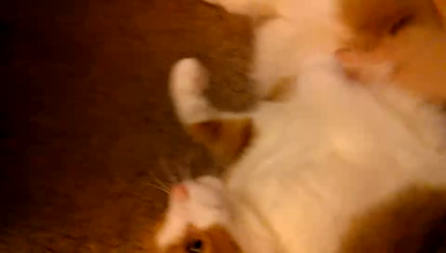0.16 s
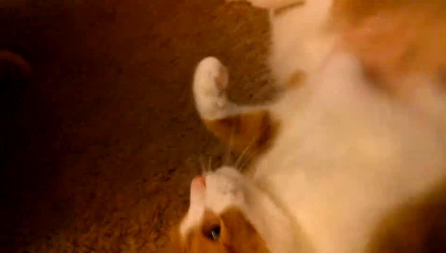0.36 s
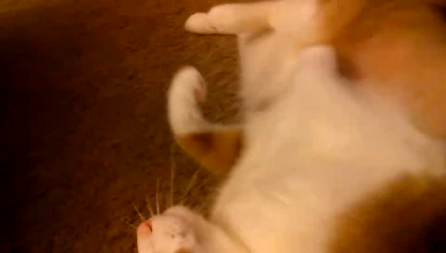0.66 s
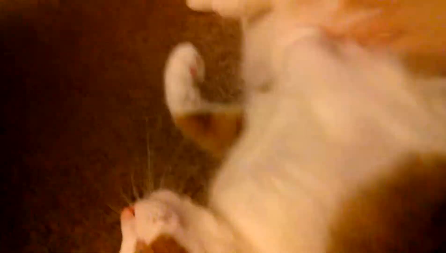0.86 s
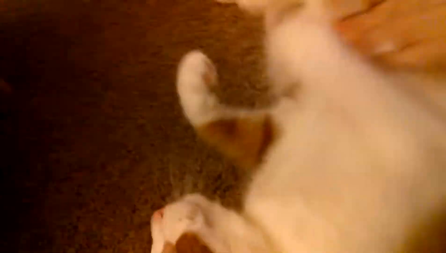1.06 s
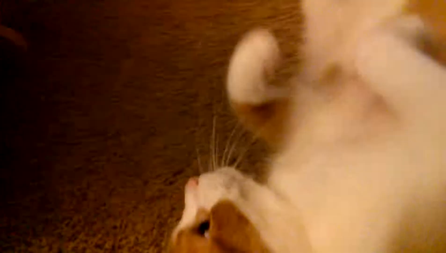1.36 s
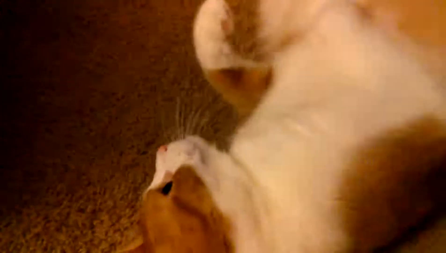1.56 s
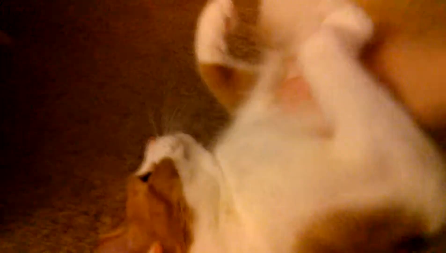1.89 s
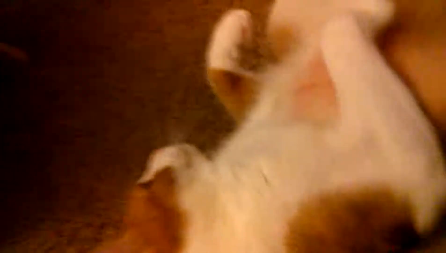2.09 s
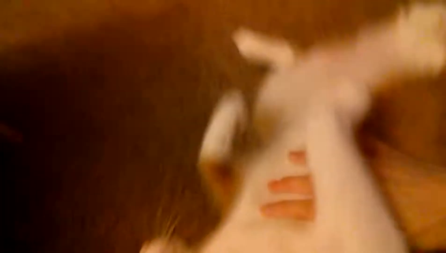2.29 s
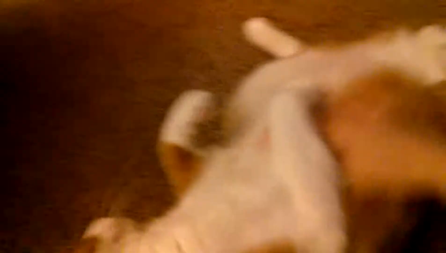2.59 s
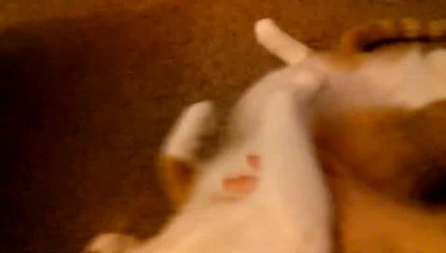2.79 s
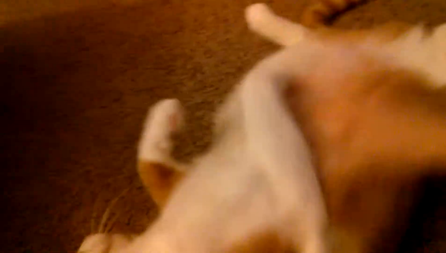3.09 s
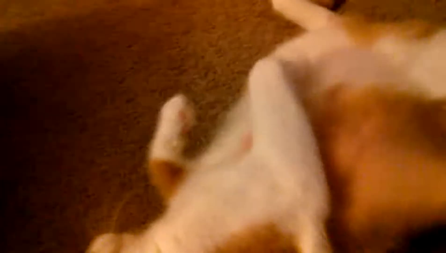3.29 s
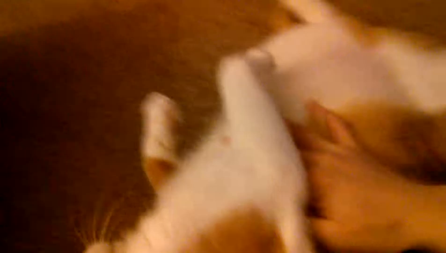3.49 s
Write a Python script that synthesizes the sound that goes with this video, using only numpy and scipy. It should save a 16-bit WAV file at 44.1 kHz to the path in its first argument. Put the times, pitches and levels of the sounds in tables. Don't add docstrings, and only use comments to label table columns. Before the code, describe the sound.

A cat purrs in a low uneven rumble while a hand quickly rubs its furry belly.

```python
import sys
import numpy as np
from scipy import signal
from scipy.fft import rfft, irfft
from scipy.io import wavfile
from scipy.ndimage import uniform_filter1d, map_coordinates

SR = 44100
rng = np.random.default_rng(int(sys.argv[2]) if len(sys.argv) > 2 else 0)


def how_loud(loudness_db):
    steps = np.asarray(loudness_db, float) / 20
    return 10 ** steps


def to_wav(sig):
    pcm = np.clip(np.atleast_2d(sig), -1, 1) * 32767
    pcm = np.round(pcm).astype(np.int16)
    wavfile.write(sys.argv[1], SR, pcm.T)


N = 160965

# time in seconds, hair hiss in dB, coat rustle in dB, shake of the phone in dB.
OUT_STROKES = [(.209, -59.5, -57.5, -44), (0.463, -57.5, -52, -41.5), (0.69, -57.5, -56, -39.5),
               (0.906, -53.5, -58.5, -36), (1.124, -53.5, -58, -33), (1.351, -56.5, -56.5, -35.5),
               (1.577, -58, -59, -40), (1.806, -60, -66.5, -40), (2.022, -59, -63, -41),
               (2.253, -58.5, -63.5, -41.5), (2.485, -57, -64.5, -43.5), (2.729, -57, -68, -50),
               (2.977, -56.5, -70, -40), (3.217, -54.5, -67, -39), (3.448, -55, -69.5, -51)]
# time in seconds, hair hiss in dB, coat rustle in dB.
BACK_STROKES = [(.074, -63.5, -67), (.340, -79, -65), (.570, -58.5, -58.5), (.789, -63.5, -57.5),
                (1.016, -63, -62), (1.239, -64, -60), (1.463, -61.5, -59.5), (1.694, -64.5, -67),
                (1.91, -64.5, -65.5), (2.133, -61, -67), (2.365, -61.5, -66.5), (2.611, -62.5, -68.5),
                (2.857, -60, -65), (3.084, -59.5, -65), (3.318, -57.5, -69), (3.558, -59, -64.5),
                (3.665, -58, -78)]
# pitch in Hz, level in dB.
HAIR_TONE = [(2500, -15.5), (4500, -8.5), (6200, -4), (8000, 2.5), (10500, -1), (13000, -4), (15500, -4)]
# pitch in Hz, level in dB.
COAT_TONE = [(300, -6), (600, 3), (1100, 2), (2000, -1.5), (3200, 0), (4500, -1), (7000, -3.5),
             (12000, -22.5)]
# time in seconds, level in dB.
PURR_LEVEL = [(0.0, -59), (0.03, -47.5), (0.12, -59), (0.28, -45.5), (0.35, -51.5), (0.46, -44),
              (0.65, -52.5), (0.68, -49), (1.61, -50), (1.65, -44.5), (1.74, -54), (1.86, -53.5),
              (2.97, -54), (3.32, -48), (3.36, -52.5), (3.57, -49.5), (3.6, -55), (3.65, -51)]
# pitch in Hz, width in Hz, level in dB.
CHEST_TONES = [(77.8, 35, -7.5), (118.8, 17.3, 3.5), (171.3, 18, 2), (240.6, 19.7, -5), (313, 56, -8),
               (500, 320, -16.5)]
# pitch in Hz, level in dB.
SLIDE_TONE = [(290, -13.5), (500, 2), (542, -1), (775, -5.5), (998, -6), (6090, -9), (8050, -20),
              (12000, -46), (15600, -58), (22000, -120)]
# time in seconds, level in dB.
SLIDE_LEVEL = [
    (0, -60),
    (.2, -56.5),
    (.35, -56.5),
    (.47, -55.5),
    (.6, -57.5),
    (.78, -58.5),
    (.84, -69),
    (1.0, -92),
]
# start in seconds, peak in dB, pitch
# in Hz, ring in seconds.
BODY_KNOCKS_AND_THUDS = [(0.267, -41.5, 320, 0.053), (.407, -32.5, 251, 0.037), (0.442, -32, 173, 0.055),
                         (.464, -34.5, 338, 0.096), (0.409, -38, 500, 0.037), (.474, -31.5, 248, 0.056),
                         (0.883, -45, 157, 0.16), (.975, -44, 150, 0.1), (1.031, -40.5, 487, 0.03),
                         (1.1263, -32.5, 296, 0.03), (1.119, -38, 240, 0.032), (1.244, -44.5, 560, 0.052),
                         (1.252, -41, 420, 0.046), (1.328, -38, 292, 0.071), (1.342, -31, 285, 0.027),
                         (1.458, -30.5, 373, 0.03), (1.463, -41, 518, 0.053), (1.634, -28.5, 175, 0.056),
                         (1.638, -37.5, 287, 0.035), (1.693, -45.5, 320, 0.053), (1.786, -50, 280, 0.058),
                         (1.689, -37.5, 480, 0.043), (1.873, -37.5, 150, 0.04), (3.291, -33.5, 197, 0.037),
                         (3.305, -44, 535, 0.11), (3.304, -37.5, 254, 0.055), (3.44, -46.5, 500, 0.066),
                         (3.52, -37, 170, 0.11), (.195, -49, 195, .05), (0.299, -38.5, 210, 0.076),
                         (0.289, -39, 72.4, 0.088), (.69, -36.5, 160, 0.064), (0.755, -41, 203, 0.031),
                         (.815, -41.5, 470, 0.036), (1.157, -34.5, 84, 0.14), (1.223, -37, 65, 0.2),
                         (1.234, -38, 268, 0.037), (1.428, -40, 62, 0.11), (1.465, -36, 95, 0.11),
                         (1.515, -44.5, 277, 0.046), (1.813, -45, 250, 0.044), (1.9, -40.5, 239, 0.064),
                         (1.932, -39, 89, 0.093), (2.028, -36, 70, 0.13), (2.076, -40, 89, 0.11),
                         (2.234, -44, 232, 0.046), (2.643, -52, 242, 0.065), (3.03, -45, 326, 0.065),
                         (3.244, -37.5, 98, 0.083), (3.345, -50, 520, 0.042), (3.555, -39, 121, 0.078),
                         (.08, -46, 417, .04), (0.271, -44, 500, 0.034), (1.335, -45, 484, 0.043),
                (3.33, -46.5, 329, 0.065), (0.531, -44, 121, 0.06), (0.771, -42, 151, 0.052),
                (0.916, -36, 120, .05), (1.586, -46, 110, 0.078), (1.85, -47, 294, 0.055),
                (1.905, -49, 535, 0.054), (2.111, -41, 158, .05), (2.24, -49, 420, 0.046),
                (2.31, -48.5, 377, 0.041), (2.584, -45, 320, 0.037), (2.599, -39, 140, .05),
                (3.049, -50.5, 470, 0.059), (3.1, -34, 140, 0.072), (3.213, -50, 306, 0.065),
                (3.411, -53.5, 486, 0.13)]
# multiple of its pitch, level in dB.
BODY_PARTIALS = [(1., 0), (.84, -5), (.6, -3), (1.3, -11)]
# start in seconds, peak in dB, pitch in Hz, ring in seconds.
CLAW_TICKS = [(.2720, -40, 960, 0.0039), (0.4652, -36, 1020, 0.0097), (0.466, -50, 3370, .005),
              (.9138, -47, 5500, .006), (1.1216, -48, 2170, 0.0028), (1.1246, -34.5, 1110, 0.0046),
              (1.1246, -29.5, 1960, 0.002), (1.4991, -38, 8060, 0.0013), (1.787, -56, 960, 0.011),
              (2.0065, -46, 900, 0.0059), (2.0103, -52, 1510, 0.005), (2.024, -63, 1650, 0.0055),
              (3.286, -55, 1050, .008), (3.305, -58, 930, 0.024), (.478, -39, 740, 0.0073),
              (.4435, -38.5, 890, 0.0045), (2.821, -63, 910, 0.013), (3.196, -55, 790, 0.029)]
# pitch in Hz, level in dB.
SNAP_TONE = [(5000, -5), (9000, -3), (13500, 0), (16500, -2)]
# pitch in Hz, level in dB.
SHAKE_TONE = [(4, -29), (10, 2.5), (20, 0), (35, -11), (60, -13.5), (90, -15.5), (150, -38)]
# pitch in Hz, level in dB.
ROOM_TONE = [(120, -37), (200, -2), (653, -18.5), (1110, -22), (1380, -26.5), (3010, -31), (6350, -31.5),
             (8350, -27), (15500, -26)]
# pitch in Hz, level in dB.
SIDE_TONE = [(300, -7.5), (1000, -5.5), (2000, 4), (4000, 4), (6000, 0), (9000, -16.5), (14000, -2.5)]
# pitch in Hz, dB relative to the sound around it.
FAINT_LIMIT = [(800, -21), (1500, -10.5), (4500, -10), (6500, -9), (11000, -18), (13500, -8), (16000, 1)]
# time in seconds, length in seconds, from Hz, to Hz.
HOLES = [
    (.40, .022, 9000, 15700),
    (.955, .02, 2800, 5300),
    (1.19, .025, 4300, 5300),
    (1.645, .035, 2000, 6000),
    (1.66, .02, 13800, 15000),
    (2.05, .05, 3900, 4600),
    (2.24, .05, 4100, 4400),
]

TIME = np.arange(N) / SR


def unit(x):
    return x / np.sqrt(np.mean(x ** 2))


def colour(x, points):
    hz, db = np.array(points, float).T
    log_hz = np.log(hz)
    f = np.log(np.fft.rfftfreq(N, 1 / SR) + 1e-3)
    outside = np.maximum(log_hz[0] - f, 0) + np.maximum(f - log_hz[-1], 0)
    return irfft(rfft(x) * how_loud(np.interp(f, log_hz, db) - 12 * outside), N)


def smooth_twice(x, size):
    return uniform_filter1d(uniform_filter1d(x, size=size), size=size)


def walk(rate):
    hold = int(SR / rate)
    aims = rng.standard_normal(N // hold + 1)
    return unit(smooth_twice(np.repeat(aims, hold), hold)[:N])


def grit(points, grain_db, flicker_db, count=3):
    grains = rng.standard_normal(N) * how_loud(grain_db * rng.exponential(size=N))
    f, t, z = signal.stft(unit(colour(grains, points)), SR, nperseg=512)
    at = np.meshgrid(count * np.log2(f / 60 + 1), 40 * t, indexing="ij")
    patch = map_coordinates(rng.standard_normal((40, 300)), at, order=1, mode="wrap")
    return unit(signal.istft(z * how_loud(flicker_db * patch), SR)[1][:N])


def curve(rows):
    return how_loud(np.interp(TIME, *np.array(rows, float).T))


def swell(s, db, rise, fall):
    grip_db, grip_s = -5.5, 0.0082
    away = TIME - np.asarray(s)[:, None]
    bell = np.exp(-(away / np.where(away < 0, rise, fall)) ** 2)
    grip = how_loud(2 * grip_db) * np.exp(-(away / grip_s) ** 2)
    return np.sqrt(np.sum(how_loud(2 * np.asarray(db))[:, None] * (bell + grip), axis=0))


def add_ring(out, s, db, hz, ring_s, rise, phase):
    i = int(s * SR)
    t = np.arange(min(int(1.5 * ring_s * SR), N - i)) / SR
    tone = np.sin(2 * np.pi * hz * t + phase)
    out[i:i + len(t)] += how_loud(db) * (1 - np.exp(-t / rise)) * how_loud(-60 * t / ring_s) * tone


def strokes():
    out_s, out_hair, out_coat, _ = np.array(OUT_STROKES).T
    back_s, back_hair, back_coat = np.array(BACK_STROKES).T

    def both_ways(out_db, back_db, lag, stretch):
        outward = swell(out_s + lag, out_db, stretch * 0.022, stretch * 0.017)
        back = swell(back_s + lag, back_db, stretch * 0.029, stretch * 0.031)
        return np.hypot(outward, back)

    fingers = swell(out_s + 0.032, out_hair - 7, 0.038, 0.038)
    hair_gain = np.hypot(both_ways(out_hair, back_hair, 0, 0.84), fingers)
    coat_gain = both_ways(out_coat, back_coat, 0.00033, 0.83)
    return hair_gain * grit(HAIR_TONE, 1.9, 0.5) + coat_gain * grit(COAT_TONE, 2.44, 4.43)


def purr():
    purr_hz, jitter, scatter_db = 26, .16, 2.5
    pulse_db, breath_db, open_share, even_share = -2.5, -4, .6, .7
    phase = np.cumsum(purr_hz * (1 + jitter * walk(22))) / SR
    size = how_loud(scatter_db * rng.standard_normal(N // 500))[phase.astype(int)]
    pulses = size * (np.diff(np.floor(phase), prepend=0) > 0)
    puffs = size * np.exp(-(phase % 1) / open_share) * rng.standard_normal(N)
    drive = how_loud(pulse_db) * unit(pulses) + how_loud(breath_db) * unit(puffs)
    chest = np.zeros(N)
    for k, (hz, width, db) in enumerate(CHEST_TONES):
        ring = signal.lfilter(*signal.iirpeak(hz, hz / width, SR), drive)
        power = smooth_twice(ring ** 2, 3000) / np.mean(ring ** 2) + 1e-9
        steady = ring / power ** (even_share / 2)
        chest += (-1) ** k * how_loud(db) / np.sqrt(width) * steady
    return unit(colour(chest, [(50, -2), (80, -1.5), (550, 0.5), (900, -29)])) * curve(PURR_LEVEL)


def slide():
    return curve(SLIDE_LEVEL) * grit(SLIDE_TONE, 2.38, 0.73)


def knocks_and_thuds():
    out = np.zeros(N)
    for s, db, hz, ring_s in BODY_KNOCKS_AND_THUDS:
        for ratio, part_db in BODY_PARTIALS[:3]:
            phase = 2 * np.pi * rng.random() * (ratio != 1)
            add_ring(out, s, db + part_db, hz * ratio, ring_s, .0025, phase)
    return out


def ticks():
    out = np.zeros(N)
    for s, db, hz, ring_s in CLAW_TICKS:
        add_ring(out, s, db + 5.5, hz, ring_s, 0.22 / hz, np.pi)
    return out


def snap():
    x = np.zeros(N)
    x[int(.91355 * SR)] = how_loud(-13.5)
    no_lows = signal.butter(6, 5000, "high", fs=SR, output="sos")
    return signal.sosfilt(no_lows, colour(x, SNAP_TONE))


def shake():
    out_s, _, _, shake_db = np.array(OUT_STROKES).T
    sway = grit(SHAKE_TONE, 0.11, 0.67)
    sway = unit(sway / np.sqrt(uniform_filter1d(sway ** 2, size=5000)))
    return np.hypot(swell(out_s + 0.045, shake_db, 0.04, 0.04), how_loud(-46.5)) * sway


def room():
    return how_loud(-59) * grit(ROOM_TONE, 0.05, 1.6)


def side_patches(air):
    strength = np.sqrt(uniform_filter1d(air ** 2, size=8000))
    return how_loud(-22) * grit(SIDE_TONE, .1, 12.7, count=6) * strength


def scene():
    air = strokes() + slide() + room()
    mid = air + purr() + knocks_and_thuds() + ticks() + snap() + shake()
    side = side_patches(air)
    return np.array([mid + side, mid - side])


def band_limit(x):
    return signal.sosfilt(signal.butter(12, 16440, fs=SR, output="sos"), x)


def record(dry):
    f, t, z = signal.stft(dry, SR, nperseg=1024)
    size = abs(z.mean(axis=0))
    near = uniform_filter1d(size, size=3, axis=0)
    around = uniform_filter1d(uniform_filter1d(size, size=25, axis=0), size=9, axis=1)
    limit = how_loud(np.interp(f, *np.array(FAINT_LIMIT).T))[:, None]
    keep = np.where(near > around * limit, 1, .1)
    for s, length, low, high in HOLES:
        lost = np.repeat(rng.random(len(f) // 4 + 1) < .88, 4)[:len(f)]
        reach = length * np.repeat(.3 + .5 * rng.random(len(f) // 8 + 1), 8)[:len(f), None]
        inside = (f > low) & (f < high) & lost
        keep[inside[:, None] & (abs(t - s) < reach)] = .05
    holed = signal.istft(z * keep, SR)[1][:, :N]
    top_cut = signal.ellip(8, .15, 25, 15720, fs=SR, output="sos")
    return band_limit(signal.sosfiltfilt(top_cut, holed))


dry = scene()
out = record(dry)
to_wav(out)
```